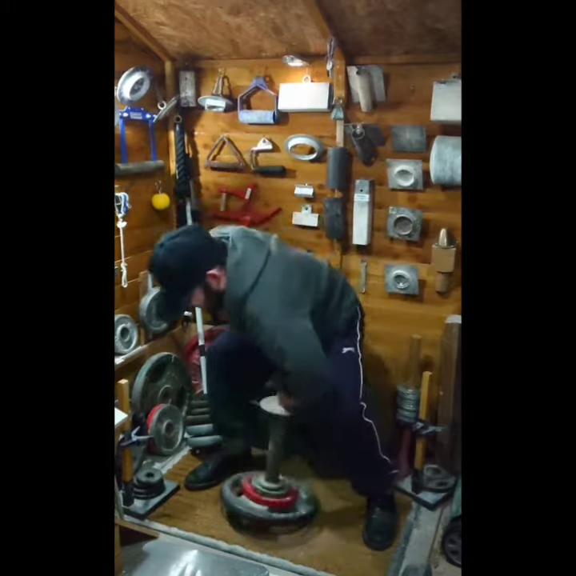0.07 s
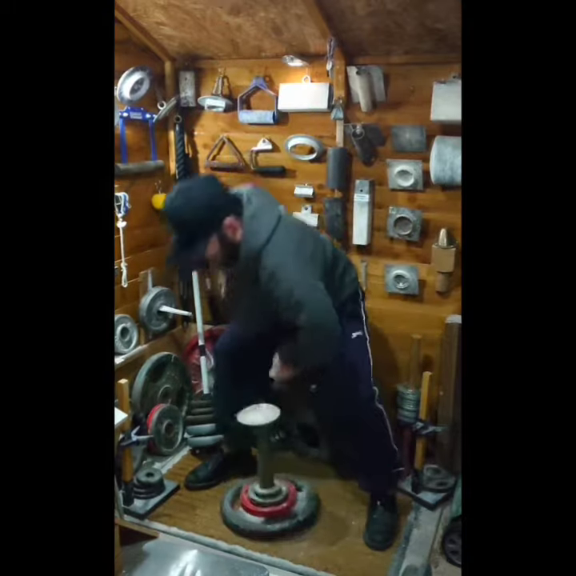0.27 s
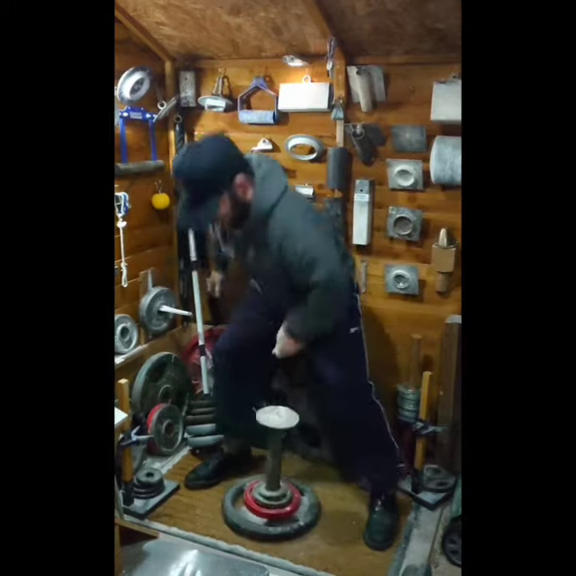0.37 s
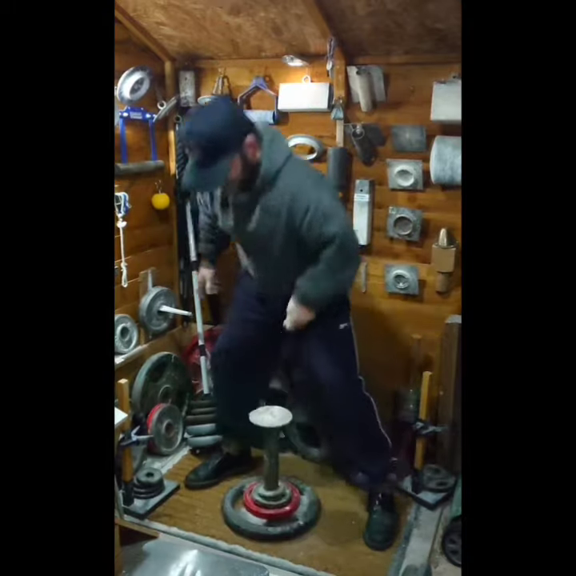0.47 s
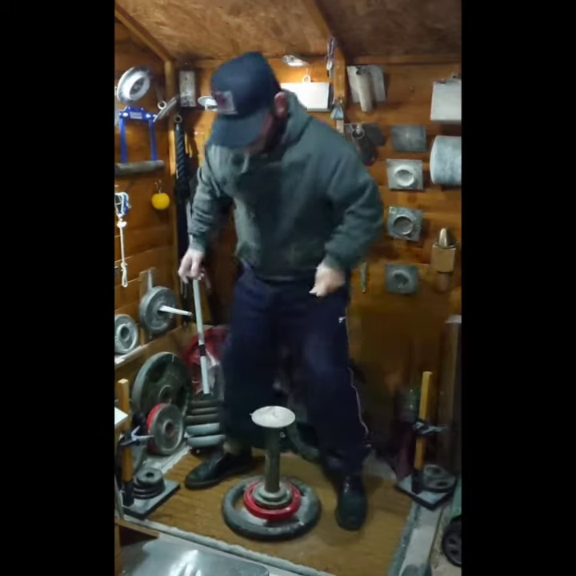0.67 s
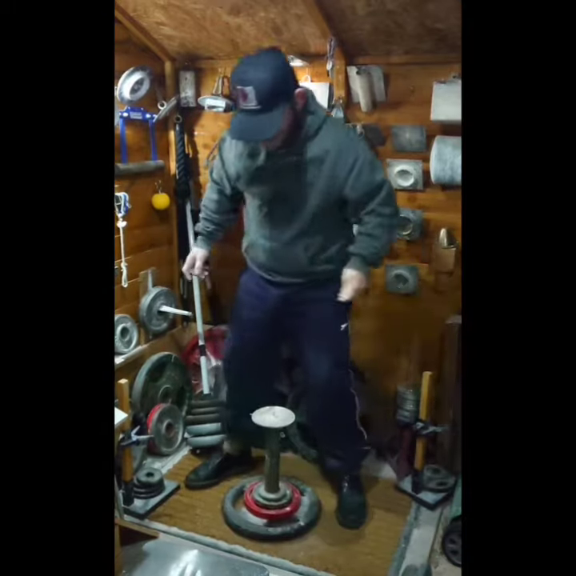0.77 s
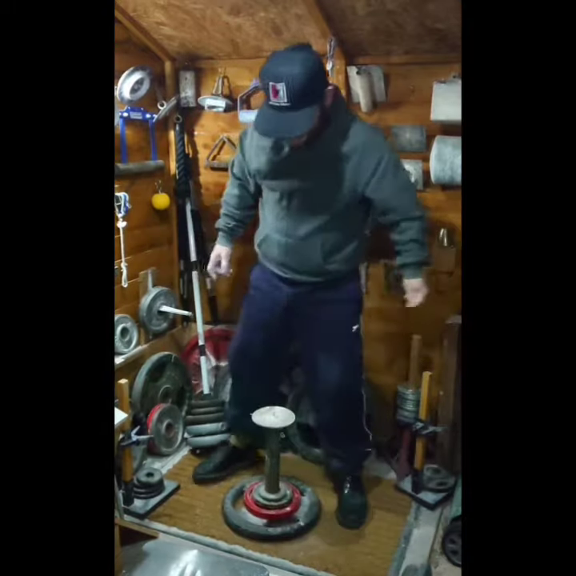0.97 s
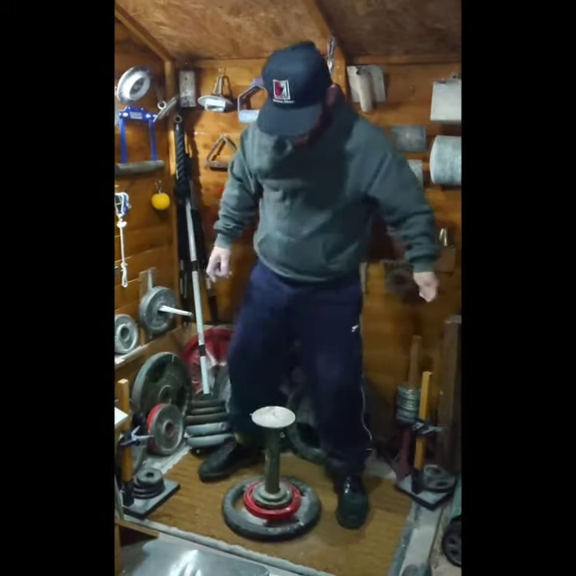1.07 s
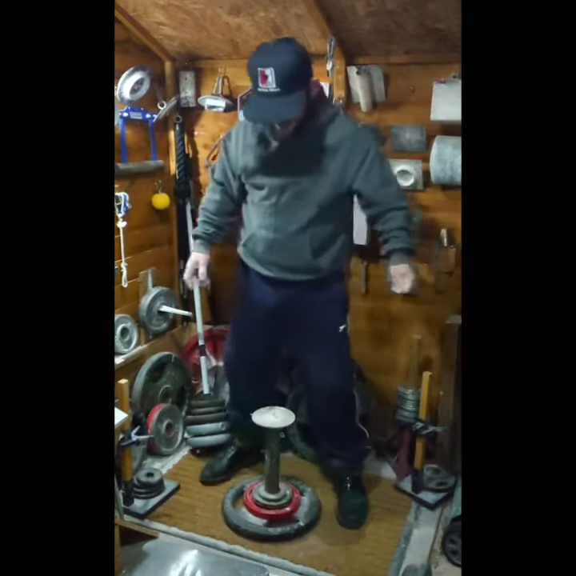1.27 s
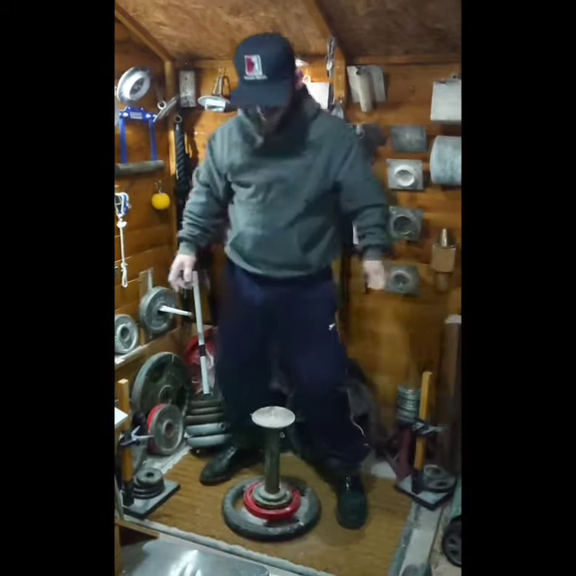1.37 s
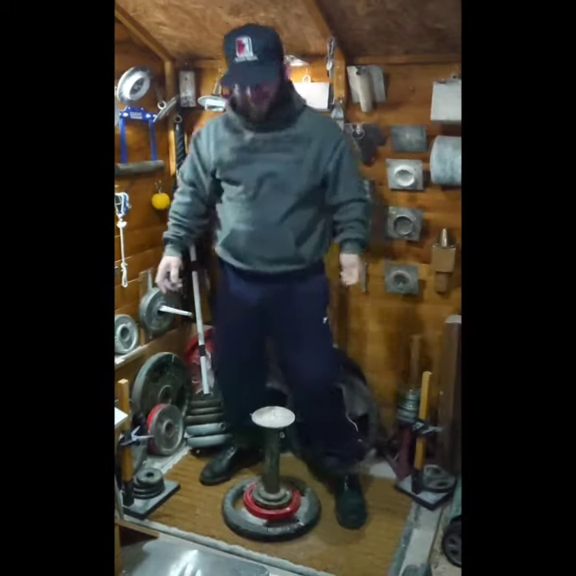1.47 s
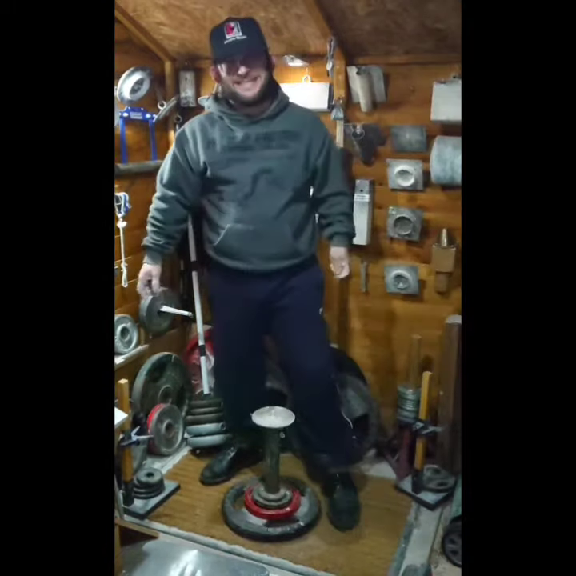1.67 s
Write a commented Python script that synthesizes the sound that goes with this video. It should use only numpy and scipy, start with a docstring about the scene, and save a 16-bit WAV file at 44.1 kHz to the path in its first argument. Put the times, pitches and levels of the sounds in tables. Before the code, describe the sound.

Iron weight plates hit floorboards with a thud and ringing clank, then rattle and settle.

```python
"""A dumbbell handle loaded with iron plates is set down on end on a small workshop's wooden floor.
At 0.2 s its edge thuds into the boards, and the shaken floor sets stored gear rattling.
At 0.4 s the stack tips flat and the plates slap together in a bright, ringing clank.
As it rocks to rest, the steel collar tinkles and a loose plate clinks on the bar until about 1.2 s.
The rattle dies away, and at 1.6 s a shoe shuffles softly."""
import sys
import numpy as np
from scipy import signal
from scipy.fft import rfft, irfft
from scipy.io import wavfile

SR = 44100
rng = np.random.default_rng(int(sys.argv[2]) if len(sys.argv) > 2 else 0)


def generate_wav(signal):
    """Clip the signal to [-1, 1] and save it as 16-bit WAV at the path in sys.argv[1]."""
    frames = np.transpose(np.atleast_2d(signal))
    scaled = np.clip(frames, -1, 1) * 32767
    pcm = np.round(scaled).astype(np.int16)
    wavfile.write(sys.argv[1], SR, pcm)


N = 74970
T = np.arange(SR) / SR  # one second, the length of a one-shot
LN_1000 = np.log(1000)  # a 60 dB decay
TAP_RISE_S, TICK_RISE_S, KNOCK_RISE_S = .008, .009, .004

# plate hits: t/s, clash level/dB, attack/s, tilt/(dB/octave), ring level/dB, favoured f/Hz
CLANKS = [(0.2026, -34, .001, -6, -52, 1320), (.222, -31, 0.013, -0.5, -37.5, 1362),
          (.288, -45, 0.0074, 8, -53.5, 2700), (0.337, -41.5, .008, 4, -51, 9860),
          (.380, -25, 0.012, 1, -32.5, 7000), (0.4054, -15, 0.0018, 0.5, -24, 1400),
          (.414, -16.5, 0.0035, 0.5, -25, 4560), (.428, -21, .003, -1.5, -30, 884),
          (0.584, -40.5, .003, 0, -44.5, 6430), (.621, -32, 0.006, -2, -39, 3500),
          (.682, -45.5, 0.003, -0.5, -39.5, 3860)]
# noisy body of the clash: f/Hz, level/dB, t60/s
CLASH_BANDS = [(80, -9.5, 1), (230, 0.5, 0.087), (880, 3, 0.21), (1000, 2, 0.15), (1640, 4.5, 0.23),
               (2300, 4.5, 0.11), (2950, -2, 0.23), (3500, 0.5, 0.3), (4600, 0.5, 0.25), (6100, -9.5, 0.37),
               (6200, -5, 0.36), (8600, -8, 0.23), (9720, -3.5, 0.3), (12200, -7, 0.22), (15500, -10, .26)]
# ringing tail of the plates, one list each: f/Hz, level/dB, t60/s
PLATE_HZ = [884, 1362, 1404, 1507, 1794, 1975, 2032, 2067, 2336, 2683, 2712, 3415, 3476, 3510, 3768, 3979,
            4457, 4672, 5110, 5663, 6429, 6720, 7019, 9863, 10860]
PLATE_DB = [-13, -15.5, -7.5, -8, -6.5, -7.5, -5, -9.5, -11, -3, -3.5, -5.5, -4.5, -6.5, -15, -4.5, -7, -6,
            -6, -9.5, -6.5, -13.5, -11, -10, -9.5]
PLATE_T60_S = [0.89, 0.9, 0.17, 0.12, 0.22, 0.21, 0.45, 0.27, 0.23, 0.13, 0.15, 0.18, 0.47, 0.22, 0.61, 0.3,
               0.16, 0.1, 0.2, 0.17, 0.17, 0.54, 0.2, 0.16, 0.11]
def plates():
    """Iron faces chatter together: a bright clash that leaves clear tones ringing."""
    clash, tones, hz = np.zeros((2, N)), np.zeros((2, N)), np.array(PLATE_HZ)
    for s, clash_db, rise_s, tilt_db, ring_db, favoured_hz in CLANKS:
        boost_db = 7 * np.exp(-(np.log2(hz / favoured_hz) / 0.06) ** 2)  # a narrow bell
        mode_db = PLATE_DB + tilt_db * np.log2(hz / 3000) + boost_db
        add(clash, s, amp(clash_db) * dense_modes(CLASH_BANDS, rise_s, tilt_db))
        add(tones, s, amp(ring_db) * ring(hz, mode_db, PLATE_T60_S, rise_s, waver_db=2.5))
    return stack_colour(clash) + tones


# notches between the stack's groups of modes: f/Hz, width/Hz, depth/dB
STACK_NOTCHES = [(1090, 70, 7), (2580, 60, 10), (2900, 120, 14), (4830, 80, 17), (6080, 130, 9),
                 (7850, 200, 12)]
def stack_colour(x):
    """The stack's resonances as a static EQ: fine random peaks and a few deep notches."""
    hz = np.fft.rfftfreq(SR, 1 / SR)
    ripple = unit_rms(signal.resample(rng.standard_normal(SR // 2 // 45), len(hz)))  # a point per 45 Hz
    ripple_db = 2.5 * ripple * np.minimum(hz / 1500, 1)
    notch_db = sum(db * np.exp(-((hz - centre) / width) ** 2) for centre, width, db in STACK_NOTCHES)
    log_gain = np.log(amp(ripple_db - notch_db))
    mirrored = np.concatenate([log_gain, log_gain[-2:0:-1]])
    minimum_phase = np.exp(np.conj(signal.hilbert(mirrored)))  # keeps the attacks sharp
    taps = np.fft.ifft(minimum_phase).real[:SR // 10]
    return signal.fftconvolve(x, taps[None] / np.linalg.norm(taps), axes=1)[:, :N]


# blows on the floor: t/s, level/dB, contact/s
THUDS = [(0.2036, -22.5, 0.0017), (0.212, -13.5, 0.0048), (0.2212, -17.5, 0.0015), (0.258, -33, 0.0016),
         (0.401, -26.5, 0.003), (0.433, -29, 0.0015), (0.49, -37, 0.021), (0.588, -31.5, 0.0049),
         (0.5961, -29, 0.0065), (.629, -34, 0.0024)]
# low boom of the floor: f/Hz, level/dB, t60/s
FLOOR_MODES = [(96.8, -9.5, 0.31), (120, 0.5, 0.066), (149, 4, 0.047), (252.8, -6, 0.16), (293, -17, 0.14),
               (358.2, -10.5, 0.13), (584, -15.5, 0.2), (609, -4.5, 0.16)]
# woody body of the boards: f/Hz, level/dB, t60/s
BOARD_BANDS = [(29.7, -7, 0.8), (69.6, -1, .55), (125, 9.5, 0.17), (300, 2.5, 0.21), (664, -1, 0.3),
               (1200, -22, 0.35), (4000, -34, .15), (16000, -60, .1)]
def floor():
    """Each blow pushes the floor for some milliseconds; a longer contact gives a duller thud."""
    out = np.zeros((2, N))
    hz, db, t60 = np.transpose(FLOOR_MODES)
    boom = -(pan(hz) * amp(db)) @ damped_waves(hz, t60).imag
    for s, level_db, contact_s in THUDS:
        push = np.sin(np.pi * T[T < contact_s] / contact_s) ** 2
        wood = boom + amp(-5.5) * dense_modes(BOARD_BANDS, contact_s)
        add(out, s, amp(level_db) * signal.fftconvolve(wood, push[None] / push.sum(), axes=1))
    return out


# loose plate taps: t/s, ring level/dB, tilt/(dB/octave), tick level/dB
CLINKS = [(.235, -35.5, -6, -74), (.476, -31, -14, -45), (.515, -32, -37, -45), (.587, -40.5, 1, -41),
          (0.684, -37.5, 6.5, -41), (.800, -34, 4.5, -41), (.907, -42, 5, -42.5), (.984, -36.5, -0.5, -43),
          (1.012, -39, -2.5, -65), (1.085, -40.5, -0.5, -48), (1.105, -38, -17, -50.5),
          (1.129, -37, -8.5, -54), (1.153, -41, -5, -57), (1.183, -46, -22.5, -70), (1.220, -49, -7.5, -66)]
# its ring, one list each: f/Hz, level/dB, t60/s
LOOSE_HZ = [2327, 2423, 3462, 4538, 4572, 5725, 6412, 6438, 7160, 8360, 11630, 12620, 14120]
LOOSE_DB = [0.5, -5, -17.5, -9.5, -11.5, -21, -20.5, -18.5, -20.5, -25, -40, -39, -37]
LOOSE_T60_S = [0.48, 0.44, 0.16, 0.18, 0.15, 0.12, 0.2, .2, 0.09, 0.15, .28, .28, .28]
# its contact tick: f/Hz, level/dB, t60/s
TICK_BANDS = [(80, -12, .3), (245.6, 0.5, 0.76), (490, -12.5, 0.6), (900, -3.5, .3), (2252, -0.5, 0.2),
              (4485, -3, 0.29), (5600, -16, 0.3), (8160, -26.5, .2), (15530, -35.5, 0.18)]
def loose_plate():
    """One plate taps the bar as the stack rocks; its two lowest modes beat."""
    out, octaves = np.zeros((2, N)), np.log2(np.array(LOOSE_HZ) / LOOSE_HZ[0])
    for s, ring_db, tilt_db, tick_db in CLINKS:
        mode_db = LOOSE_DB + tilt_db * octaves
        add(out, s, amp(ring_db) * ring(LOOSE_HZ, mode_db, LOOSE_T60_S, TAP_RISE_S, waver_db=2))
        add(out, s, amp(tick_db) * dense_modes(TICK_BANDS, TICK_RISE_S, .06 * tilt_db))
    return out


# collar contacts: t/s, level/dB, favoured f/Hz
TINKLES = [(0.229, -34, 12400), (0.344, -35, 9300), (.486, -25, 10500), (0.491, -27.5, 13000),
           (0.522, -30.5, 10260), (0.527, -38, 14900), (0.56, -39.5, 11400), (.656, -37, 12200),
           (0.803, -50, 13700), (0.817, -37.5, 10000), (0.94, -48, 10050)]
# its glassy ring, one list each: f/Hz, level/dB
COLLAR_HZ = [9640, 9870, 10240, 10850, 11620, 12600, 13780, 14720, 15300, 15530]
COLLAR_DB = [-1, -8, -8.5, -11, -13, -7.5, -2, -5, -1, -1]
# scrape around the favoured pitch: offset/Hz, level/dB
SCRAPE_SHAPE = [(-6000, -21.5), (-900, -16.5), (2.5, 1), (900.5, -15.5), (6003, -15)]
def collar():
    """The steel collar tinkles with a little scrape; each contact favours one group of modes."""
    tones, scrape, t60 = np.zeros((2, N)), np.zeros((2, N)), 0.15
    for s, db, favoured_hz in TINKLES:
        cut_db = np.minimum(9 * abs(np.array(COLLAR_HZ) - favoured_hz) / 2000, 22)
        add(tones, s, amp(db) * ring(COLLAR_HZ, COLLAR_DB - cut_db, t60, TAP_RISE_S, waver_db=3))
        bands = [(favoured_hz + offset_hz, level_db, t60) for offset_hz, level_db in SCRAPE_SHAPE]
        add(scrape, s, amp(db - 10) * dense_modes(bands, TICK_RISE_S))
    return tones + stack_colour(scrape)


# fader ride of the rattle: t/s, level/dB
RATTLE_FADER = [(.2, -47), (.26, -32), (.33, -43.5), (.5, -41.5), (.7, -42), (.8, -48), (.95, -47),
                (1.1, -42.5), (1.2, -46), (1.33, -53.5), (1.45, -60), (1.6, -70), (1.7, -63.5)]
# clear tones shared out among the pieces of gear: f/Hz, level/dB
GEAR_MODES = [(232, -15.5), (285, -13), (605, -2.5), (719, -3.5), (751, -9.5), (845, -4), (883, -5),
              (965, -1), (1384, -7.5), (1437, -9), (1841, -7.5), (1992, -5.5)]
def gear_rattle():
    """Many small random knocks of stored metal, each piece with its own tones, fade as the floor settles."""
    out, pieces, knocks_per_s = np.zeros((2, N)), 6, 170
    for piece in range(pieces):
        triggers = rng.random(N) < knocks_per_s / pieces / SR
        hits = triggers * amp(1.5 * rng.standard_normal(N))
        hz, db = np.transpose(GEAR_MODES[piece::pieces])
        body = knock(t60=0.27) + ring(hz, db, t60=0.29, rise_s=KNOCK_RISE_S, waver_db=2)
        out += signal.fftconvolve(hits[None], body, axes=1)[:, :N]
    t = np.arange(N) / SR
    fader = amp(np.interp(t, *np.transpose(RATTLE_FADER)))
    return unit_rms(out) * fader * (t > THUDS[0][0])  # silent until the first thud


# accents in the rattle: t/s, level/dB, tilt/(dB/octave)
JOLTS = [(.684, -41.5, -5), (1.293, -50, -2), (1.322, -49.5, -1), (1.492, -60, -5)]
def gear_jolts():
    """Single firmer knocks of the gear stand out of the rattle."""
    out = np.zeros((2, N))
    for s, db, tilt_db in JOLTS:
        add(out, s, amp(db) * knock(t60=0.094, tilt_db=tilt_db))
    return out


# midrange colour of a knock: f/Hz, level/dB
KNOCK_COLOUR = [(60, -7.5), (170, -21), (260, -7.5), (450, -15), (620, 1.5), (900, 0), (1120, -6),
                (1400, 0.5), (1560, -5), (2000, -3), (2500, 1), (3000, -16), (4300, -15.5), (6000, -32),
                (16000, -65)]
def knock(t60, tilt_db=0):
    """One piece of stored metal is bumped: a dull, decaying burst of noise."""
    attack = np.minimum(T / KNOCK_RISE_S, 1)
    return noise(KNOCK_COLOUR, SR, tilt_db) * attack * np.exp(-LN_1000 * T / t60)


# shoe moves: t/s, level/dB, attack/s
SHUFFLES = [(1.634, -58.5, 0.025), (1.672, -59.5, 0.013)]
# body of a scuff: f/Hz, level/dB, t60/s
SCUFF_BANDS = [(59.8, -31, 0.24), (259, 8, 0.37), (458, -15, 0.46), (760, 4.5, 0.3), (2468, -2, 0.23),
               (4650, -12, 0.39), (6400, -35, 0.17)]
def shoe():
    """A sole scuffs softly on the boards."""
    out = np.zeros((2, N))
    for s, db, rise_s in SHUFFLES:
        add(out, s, amp(db) * dense_modes(SCUFF_BANDS, rise_s))
    return out


def wall_echoes(x, t60=0.13, echoes_per_s=2000, predelay_s=.004):
    """Close wooden walls throw back short, sparse echoes."""
    taps = rng.choice([-1., 1.], (2, SR)) * (rng.random((2, SR)) < echoes_per_s / SR)
    taps *= (T > predelay_s) * np.exp(-LN_1000 * T / t60)
    return signal.fftconvolve(x, taps / np.linalg.norm(taps[0]), axes=1)[:, :N]


# dark bed of room tone: f/Hz, level/dB
AIR_COLOUR = [(25, 10), (130, -3.5), (650, -10), (1200, -16.5), (4700, -22.5), (6200, -40)]
def room_tone():
    """The still air of the workshop, faint and steady."""
    return amp(-66.5) * noise(AIR_COLOUR, N)


# stereo image of the microphone pair: f/Hz, left-right correlation, left minus right/dB
STEREO_IMAGE = [(100, 0.89, 4), (300, 0.98, 3), (640, 0.64, -3.5), (1284, -0.57, -1.5), (2343, 0.3, -4),
                (4240, -0.084, -3), (9100, -0.092, -1.5), (14000, 0.16, 3)]
def pan(hz):
    """Left and right gain at each frequency."""
    return amp(np.outer([.5, -.5], curve(STEREO_IMAGE, hz, column=2)))


def noise(colour, size, tilt_db=0):
    """Coloured stereo noise of rms 1, then tilted by tilt_db per octave about 3 kHz."""
    hz = np.fft.rfftfreq(size, 1 / SR)
    left, spare = rfft(rng.standard_normal((2, size)))
    correlation = curve(STEREO_IMAGE, hz)
    right = correlation * left + np.sqrt(1 - correlation ** 2) * spare
    spectrum = np.array([left, right]) * pan(hz) * amp(curve(colour, hz))
    tilt = amp(tilt_db * np.log2(np.maximum(hz, 500) / 3000))
    return irfft(spectrum * tilt, size) / irfft(spectrum, size).std()


def dense_modes(bands, rise_s, tilt_db=0):
    """Countless close modes blur into noise: they build up, then each band dies at its own speed."""
    hz, t, frames = signal.stft(noise(bands, SR, tilt_db), SR, nperseg=256)
    t60 = curve(bands, hz, column=2)[:, None]
    decay = amp(-60 * np.maximum(t - rise_s, 0) / t60)
    return signal.istft(frames * decay, SR, nperseg=256)[1][:, :SR] * build_up(rise_s)


def ring(hz, db, t60, rise_s, waver_db):
    """Clear metal modes, struck a little differently each time, wavering in level."""
    hz, wavers_per_s = np.array(hz, float), 90
    gain = pan(hz) * amp(db + 1.5 * rng.standard_normal(len(hz)))
    phase = 2 * np.pi * rng.random(len(hz))
    # each mode is out of step at the two microphones
    phase_gap = np.arccos(curve(STEREO_IMAGE, hz)) * rng.choice([-1, 1], len(hz))
    phase = phase + np.outer([.5, -.5], phase_gap)
    points = rng.standard_normal((len(hz), wavers_per_s))
    waver = np.array([np.interp(T * wavers_per_s, np.arange(wavers_per_s), row) for row in points])
    waves = damped_waves(hz, t60) * amp(waver_db * waver)
    return ((gain * np.exp(1j * phase)) @ waves).real * build_up(rise_s)


def damped_waves(hz, t60):
    """One decaying complex sinusoid per mode."""
    return np.exp(np.outer(2j * np.pi * hz - LN_1000 / np.array(t60), T))


def build_up(rise_s):
    """A contact closes gradually: the level climbs evenly through 20 dB."""
    return amp(-20 * np.maximum(1 - T / rise_s, 0))


def curve(table, hz, column=1):
    """One column of a table, interpolated on a log-frequency axis."""
    table = np.array(table)
    return np.interp(np.log(hz + 1), np.log(table[:, 0] + 1), table[:, column])


def amp(db):
    """Decibels to gain."""
    return 10 ** (np.asarray(db) / 20)


def unit_rms(x):
    """Scales to rms 1."""
    return x / np.sqrt(np.mean(x ** 2) + 1e-20)


def add(mix, s, sound):
    """Drops a stereo sound into the mix at time s."""
    part = mix[:, round(s * SR):][:, :sound.shape[1]]
    part += sound[:, :part.shape[1]]


def scene():
    """The mix: only the dumbbell's metal is sent to the wall echoes."""
    metal = plates() + loose_plate() + collar()
    dumbbell = metal + floor() + amp(-14.5) * wall_echoes(metal)
    return dumbbell + gear_rattle() + gear_jolts() + shoe() + room_tone()


def record(dry, low_cut_hz=77, high_cut_hz=16000):
    """The microphone's bass roll-off and the recorder's band limit."""
    low_cut = signal.butter(2, low_cut_hz, "high", fs=SR, output="sos")
    high_cut = signal.firwin(511, high_cut_hz, window=("kaiser", 9), fs=SR)
    return signal.oaconvolve(signal.sosfilt(low_cut, dry), high_cut[None], "same")


dry = scene()
out = record(dry)
generate_wav(out)
```